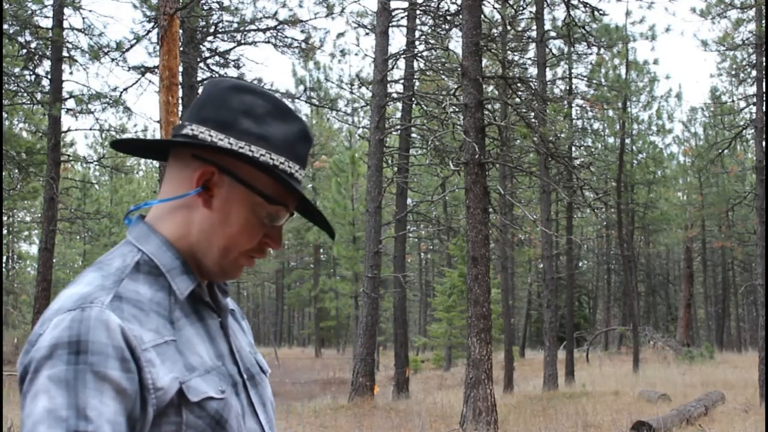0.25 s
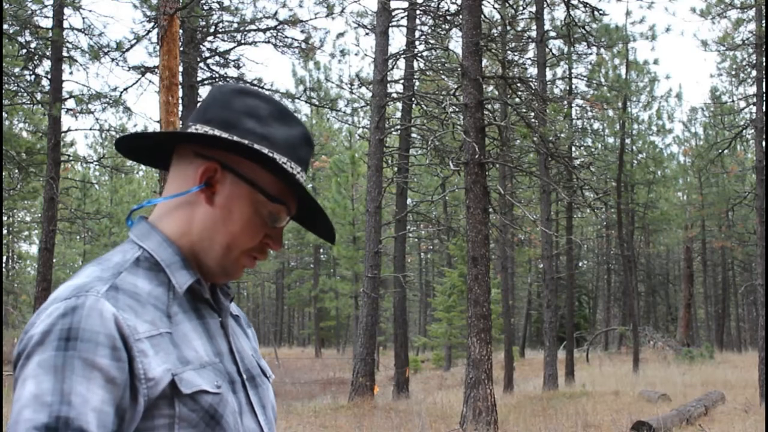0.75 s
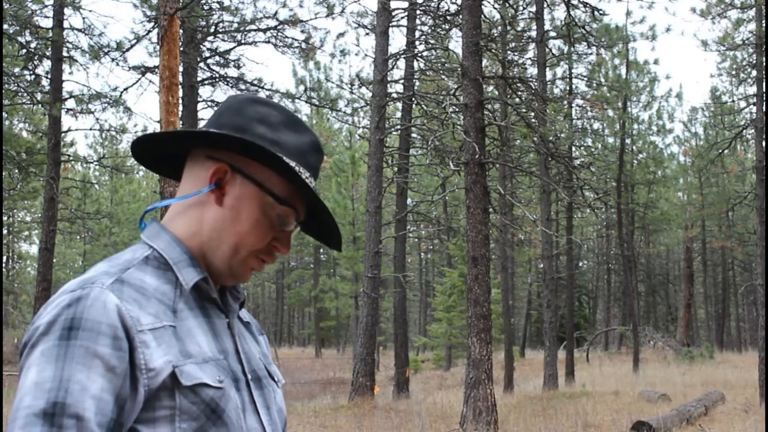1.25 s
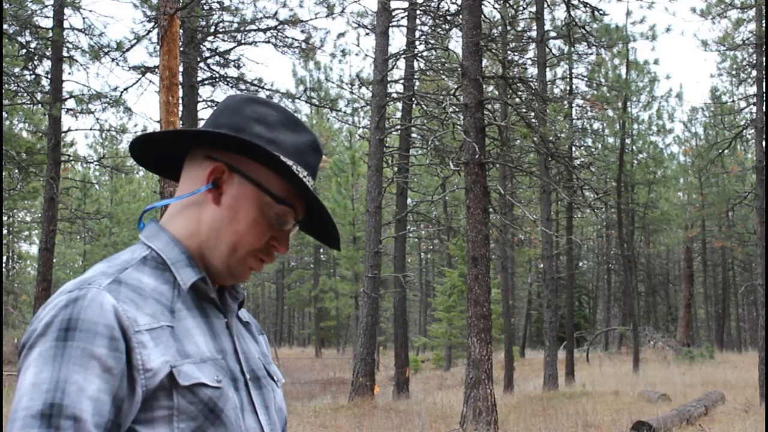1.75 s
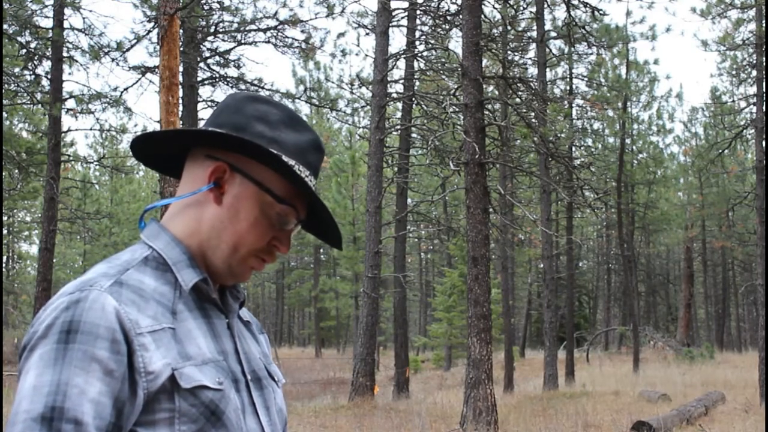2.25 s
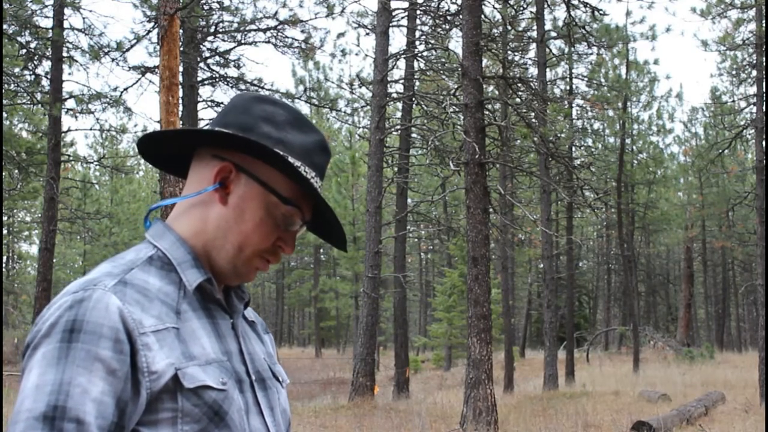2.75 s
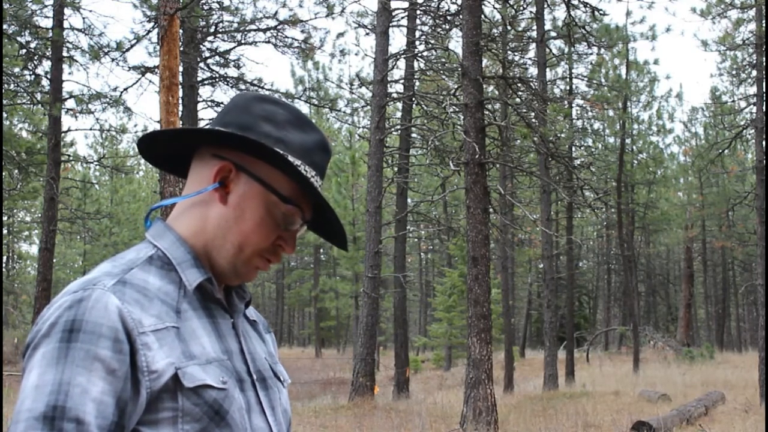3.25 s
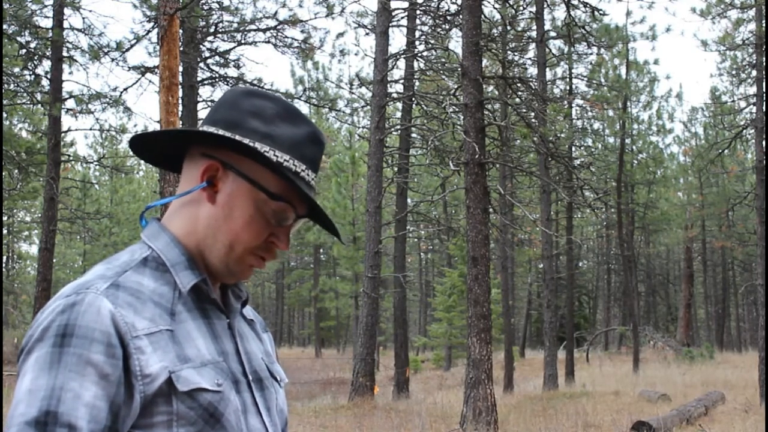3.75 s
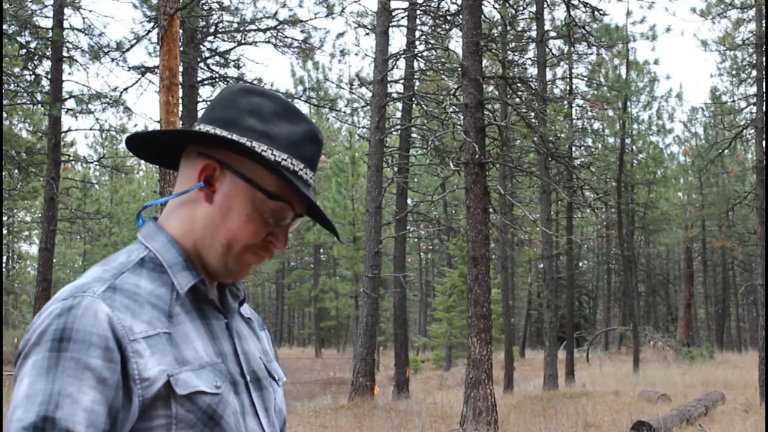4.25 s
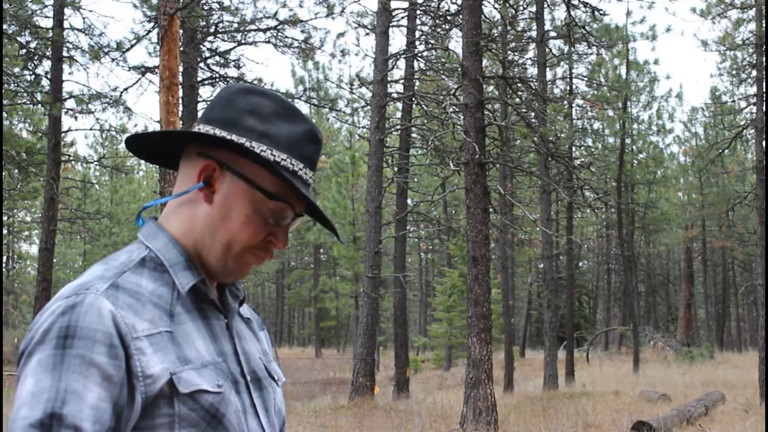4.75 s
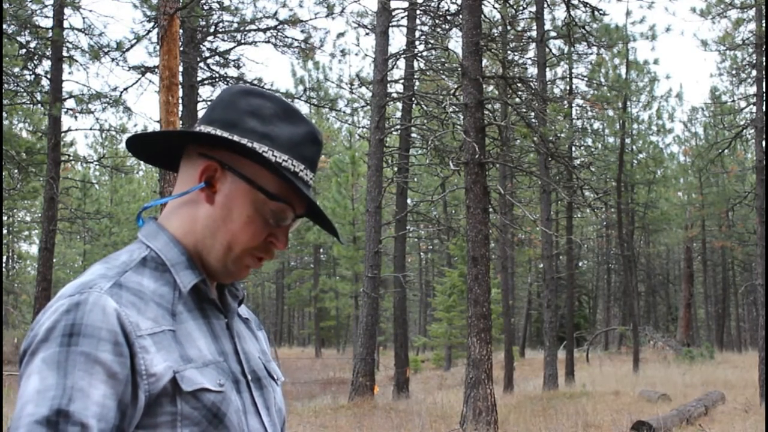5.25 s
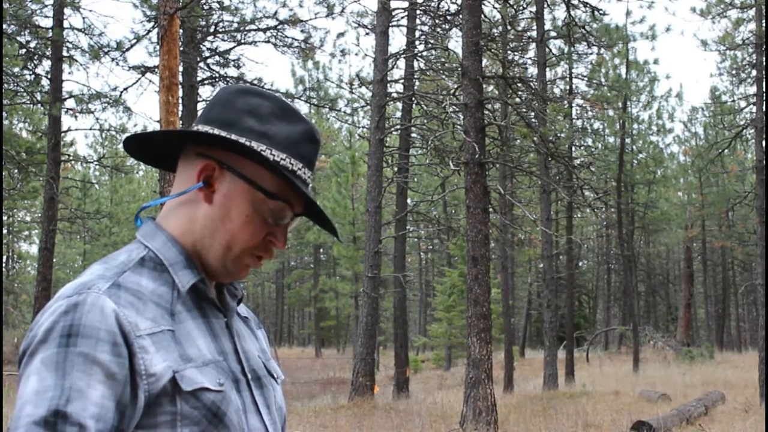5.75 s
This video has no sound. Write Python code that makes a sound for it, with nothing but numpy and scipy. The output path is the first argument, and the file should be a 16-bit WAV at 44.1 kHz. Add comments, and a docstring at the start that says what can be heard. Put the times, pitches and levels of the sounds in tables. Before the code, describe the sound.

A revolver is handled very near the microphone in open woodland: one snap, two separate series of loud ratcheting clicks with brief metallic ring, a quiet gap with faint skin-on-metal rubs, then a dry hammer drop, light touches and a softer final click. A low throbbing idle and airy rumble lie behind, dipping under the clicks and rising in the gaps. Nearly mono, with little echo.

```python
"""A sharp steel click opens the scene: a revolver is handled close to the microphone in a pine forest.
Its hammer is twice drawn through its notches, then dropped; random impact forces excite damped steel resonances.
Decaying sines leave a faint ring, and random slips make the rub of skin on steel.
Far off, engines idle and drone as sums of harmonics, under forest air and rumble made of filtered noise.
Loud clicks overload the recorder and duck its gain, so the background drops away and swells back."""
import sys
import numpy as np
from scipy import signal
from scipy.fft import rfft, irfft, next_fast_len
from scipy.io import wavfile
from scipy.ndimage import map_coordinates

SR = 44100
rng = np.random.default_rng(int(sys.argv[2]) if len(sys.argv) > 2 else 0)


def to_wav(s):
    """Save 16-bit WAV."""
    ch = np.atleast_2d(s).T  # columns
    pcm = np.round(np.clip(ch, -1, 1) * 32767)  # PCM
    wavfile.write(sys.argv[1], SR, pcm.astype(np.int16))


N = 264159
TIME = np.arange(N) / SR
HIT_TIME = TIME[:SR // 10]

# Hammer and lock clicks, levels before gain control:
# start_s, level_db, tilt_db_per_octave, tail_db, ring_db, movement (name)
LOCK_CLICKS = [ (0.0754, 7.5, 1.5, -15.5, -48, "drop"), (0.4081, 8.5, 4.5, -45, -24, "first draw"),
               (0.4863, 16, 5.5, -15.5, -23.5, "first draw"), (0.5976, 16.5, 5.5, -52, -28, "first draw"),
               (0.7614, 13, 4, -22, -34.5, "first draw"), (2.1604, 4.5, -2.5, -31, -30.5, "second draw"),
               (2.4090, 10, -1, -49, -31, "second draw"), (2.4960, 12, -1, -40.5, -41, "second draw"),
               (2.6705, 13.5, -0.5, -36, -33.5, "second draw"),
               (2.9442, 13.5, -0.5, -51, -28.5, "second draw"), (4.5379, -4.5, -1, -13.5, -58, "drop"),
               (4.5457, -4, -3.5, -27.5, -59.5, "drop"), (4.5497, 13.5, -2, -11.5, -37.5, "drop"),
               (5.7285, 2, -1, -21.5, -62, "drop")]
# Colour shared by the clicks of a movement, keyed by its name:
# chatter_length_ms, knock_offset_db, ping_offset_db, cylinder_ring_offset_db, frame_ring_offset_db
MOVEMENT_COLOURS = { "first draw": (5.5, 0.5, -8, 2.5, -16.5), "second draw": (6.5, 0.5, 9.5, -19.5, 5.5),
                    "drop": (2.5, 0.5, -3.5, -6.5, 0.5)}
# Lasting modes of the cylinder: pitch_hz, level_db (relative), t60_s
CYLINDER_MODES = [(4608, -11, .2), (4955, -9, .25), (5303, -15, .3), (5819, -4, .35), (6002, 0, .33),
                  (6146, -5, .25), (6245, -7, .15)]
# Lasting modes of the frame: pitch_hz, level_db (relative), t60_s
FRAME_MODES = [(2692, -10, .25), (3795, -5, .13), (4490, -10, .18), (4748, -4, .33), (4965, -9, .2),
               (5825, -11, .3), (6005, -8, .2), (6200, -3, .16), (9819, -11, .1)]


def revolver():
    """Impact and free vibration: each lock click leaves cylinder and frame ringing."""
    out = np.zeros(N)
    for start_s, level_db, tilt_db, tail_db, ring_db, movement in LOCK_CLICKS:
        length_ms, knock_db, ping_db, cylinder_db, frame_db = MOVEMENT_COLOURS[movement]
        impact = click(length_ms, tilt_db, KNOCK_MODE[0], knock_db, ping_db, tail_db)
        cylinder = from_db(ring_db + cylinder_db) * ring(CYLINDER_MODES)
        frame = from_db(ring_db + frame_db) * ring(FRAME_MODES)
        add(out, start_s, from_db(level_db) * impact)
        add(out, start_s, cylinder + frame)
    return out


def ring(modes):
    """Modal decay: a sum of exponentially dying sines, a little different at every blow."""
    t = TIME[:SR // 2]
    out = np.zeros(len(t))
    for pitch_hz, level_db, t60_s in modes:
        envelope = from_db(level_db + rng.normal(0, 0.59) - 60 * t / t60_s)
        out += envelope * np.sin(2 * np.pi * (pitch_hz * t + rng.random()))
    return out


# Main knock resonance of the gripped gun, a single row: pitch_hz, width_hz, level_db (relative)
KNOCK_MODE = (2680, 230, -6.5)
# High, quickly damped pings: pitch_hz, width_hz, level_db (relative)
PING_MODES = [(9870, 840, 1), (12730, 1300, -5)]
# Other quickly damped resonances of the gripped gun: pitch_hz, width_hz, level_db (relative)
BODY_MODES = [(589.4, 2600, -15), (1800, 300, -19.5), (3036, 660, -15.5), (3990, 800, -7),
              (5830, 940, -6.5), (6510, 350, -12), (7740, 1900, -6), (9120, 700, -7), (10370, 670, -15.5),
              (13500, 2300, -17)]


def click(length_ms, tilt_db, knock_hz, knock_db, ping_db, tail_db):
    """Forced resonance: chatter drives damped modes; where the blow lands sets its tilt, knock and ping."""
    knock = (knock_hz, KNOCK_MODE[1], KNOCK_MODE[2] + knock_db)
    pings = [(hz, width, db + ping_db) for hz, width, db in PING_MODES]
    sound = 0
    for hz, width, db in BODY_MODES + pings + [knock]:
        # each mode gets its own random chatter
        vibration = unit_hit(resonate(chatter(length_ms, tail_db), hz, width))
        sound = sound + from_db(db + tilt_octaves(tilt_db, hz)) * vibration
    # a small body radiates the bass weakly; the contact itself limits the treble
    radiation_hz, contact_hz = 260, 12900
    band = signal.butter(3, [radiation_hz, contact_hz], "band", fs=SR, output="sos")
    return unit_hit(signal.sosfilt(band, sound))


def chatter(length_ms, tail_db, second_db=-8.5, third_db=-11.5, decay_share=0.33):
    """Repeated impact: steel lands and rebounds twice, three dying bursts; a faint decaying hiss trails some
    clicks."""
    tail_t60_s = 0.076
    t = HIT_TIME * 1000 / length_ms  # in chatter lengths
    force = from_db(tail_db - 60 * HIT_TIME / tail_t60_s)
    for at, db in ((0, 0), (.36, second_db), (.72, third_db)):
        decay = np.exp(-(np.abs(t - at) / decay_share) ** np.sqrt(2))
        force = force + (t >= at) * from_db(db) * decay
    return force * rng.choice([-1, 1], len(t))


# Skin sliding on steel, levels before gain control:
# start_s, length_s, level_db, favoured_pitch_hz, favoured_level_db (relative to the common grain)
RUB_STROKES = [(3.47, 0.165, -34, 2590, 6), (3.588, 0.084, -38.5, 9500, -11), (4.137, 0.14, -44, 6540, -8),
               (4.589, 0.22, -37, 6670, -23.5), (4.789, 0.17, -39.5, 5170, -6),
               (5.069, 0.029, -36, 3680, 6), (5.336, 0.17, -44, 3400, 7)]


def fingers(slips_per_s=2600, tilt_db=-4.5, width_hz=260):
    """Stick-slip friction: tiny slips tick the gun's resonances; each stroke favours the part it rubs."""
    slips = (rng.random(N) < slips_per_s / SR) * rng.standard_normal(N)
    grain = np.zeros(N)
    for hz, width, db in BODY_MODES:
        grain += from_db(db + tilt_octaves(tilt_db, hz)) * rms_one(resonate(slips, hz, width))
    grain = rms_one(grain)
    out = np.zeros(N)
    for start_s, length_s, level_db, favoured_hz, favoured_db in RUB_STROKES:
        span = slice(int(start_s * SR), int((start_s + length_s) * SR))
        favoured = rms_one(resonate(slips[span], favoured_hz, width_hz))
        stroke = rms_one(grain[span] + from_db(favoured_db) * favoured)
        add(out, start_s, from_db(level_db) * stroke * signal.windows.tukey(len(stroke), .7))
    return out


# Light touches of fingers and loose parts, levels before gain control:
# start_s, level_db, chatter_length_ms, tilt_db_per_octave, knock_offset_db
LIGHT_TOUCHES = [ (0.033, -25.5, 10, -9, 12), (0.455, -18, 6.7, -11, 17), (0.719, -21, 6.8, -10, -2),
                 (1.305, -35, 12, -1, 0), (2.3464, -18, 3.4, -2.5, 2.5), (3.4905, -10.5, 3.6, 4, 26),
                 (4.712, -25.5, 1.4, 6, 7), (5.014, -21.5, 1, -2.5, -13), (5.189, -14, 6.8, 4.5, 8.5),
                 (5.1989, -13.5, 3.4, 7, 12), (5.352, -25.5, 5, -3.5, 3), (5.398, -32.5, 4.2, -12, 17)]


def handling():
    """Weak impact: light touches, and faint ticks scattered by chance through each slide of the fingers."""
    touch_knock_hz, tick_knock_hz = 2504, 3250
    ticks_per_s, tick_over_rub_db, tick_spread_db = 12, 3, 2.5
    out = np.zeros(N)
    for start_s, level_db, length_ms, tilt_db, knock_db in LIGHT_TOUCHES:
        touch = click(length_ms, tilt_db, touch_knock_hz, knock_db, ping_db=-6.5, tail_db=-25.0)
        add(out, start_s, from_db(level_db) * touch)
    for start_s, length_s, rub_db, *_ in RUB_STROKES:
        for at in rng.uniform(start_s, start_s + length_s, round(ticks_per_s * length_s)):
            tick = click(length_ms=2.5, tilt_db=-2.5, knock_hz=tick_knock_hz,
                         knock_db=4.5, ping_db=-5.0, tail_db=-30.5)
            add(out, at, from_db(rub_db + rng.normal(tick_over_rub_db, tick_spread_db)) * tick)
    return out


# Idling engine, speeding up a little and sagging again: time_s, four_firing_cycle_rate_hz
IDLE_RATE = [(0, 10.64), (0.3, 11.58), (1.2, 11.63), (2.2, 11.87), (2.9, 12.31), (4.2, 12.17), (5.1, 11.83),
             (5.99, 10.75)]
# Uneven cylinders fill in quarter orders: multiple_of_four_firing_cycle, level_db (mean, before gain control)
IDLE_HARMONICS = [(2, -42), (4, -32.5), (5, -35.5), (6, -35.5), (7, -45), (8, -32), (9, -52.5), (10, -46.5),
                  (11, -45), (12, -51)]
# Drone of the far engine: multiple_of_fundamental, level_db (mean at its crest, before gain control)
DRONE_HARMONICS = [(4, -42), (5, -42.5), (6, -49.5)]
# Spectrum of the forest air: pitch_hz, level_db_per_hz (relative)
AIR_SPECTRUM = [(30, -35), (150, -6), (280, -6), (570, -4), (750, -5), (980, -3), (1300, -13),
                (1900, -15.5), (2700, -20), (3600, -27.5), (5000, -30), (9400, -36), (12500, -42.5),
                (15500, -46.5)]
# Spectrum of the low rumble: pitch_hz, level_db_per_hz (relative)
RUMBLE_SPECTRUM = [(12, -11), (32, -7.5), (65, 16), (130, -2), (175, -14)]


def background():
    """Superposition of tones and noise: a throbbing idle, a higher drone, low rumble and forest air."""
    cycle_hz = np.interp(TIME, *np.transpose(IDLE_RATE))
    idle = engine(cycle_hz, IDLE_HARMONICS, waver_db=1.5, aligned_s=.033)
    # the drone creeps upward, loudest as the breeze carries it over
    drone_start_hz, drone_rise_hz_per_s = 66.17, .2
    drone_crest_s, drone_fade_db_per_s = 4.3, 1.76
    breeze = from_db(-drone_fade_db_per_s * np.abs(TIME - drone_crest_s))
    drone_hz = drone_start_hz + drone_rise_hz_per_s * TIME
    drone = breeze * engine(drone_hz, DRONE_HARMONICS, waver_db=4.0)
    air_db = -33 + drift(22) / 2
    air = from_db(air_db) * coloured(AIR_SPECTRUM)
    rumble = from_db(-48.5) * coloured(RUMBLE_SPECTRUM)
    return idle + drone + air + rumble


def engine(cycle_hz, orders, waver_db, aligned_s=0):
    """Harmonic synthesis: orders roughly aligned at a trough, each wavering on its way through the trees."""
    turns = np.cumsum(cycle_hz) / SR
    angle = 2 * np.pi * (turns - np.interp(aligned_s, TIME, turns))
    out = np.zeros(N)
    for order, level_db in orders:
        gain = from_db(level_db + waver_db * drift(6))
        phase = rng.normal(np.pi, 0.91)  # pi is a trough
        out += gain * np.cos(round(order) * angle + phase)
    return np.sqrt(2) * out


def drift(rate):
    """Slow random modulation: smooth chance of spread 1 that turns about rate times a second."""
    knots = rng.standard_normal(256)
    return rms_one(map_coordinates(knots, [TIME * rate], order=2, mode="mirror"))


def coloured(spectrum):
    """Spectral shaping: white noise weighted in frequency, at unit rms."""
    hz, db = np.transpose(spectrum)
    size = next_fast_len(N)
    bins = np.maximum(np.fft.rfftfreq(size, 1 / SR), 1)
    gain = from_db(np.interp(np.log(bins), np.log(hz), db))
    white = rfft(rng.standard_normal(size))
    return rms_one(irfft(white * gain, size)[:N])


def resonate(x, hz, width):
    """Damped oscillator: a two-pole resonance whose bandwidth sets its decay."""
    r = np.exp(-np.pi * width / SR)
    poles = [1, -2 * r * np.cos(2 * np.pi * hz / SR), r * r]
    return signal.lfilter([1 - r, 0, r - 1], poles, x + 1e-18)


def tilt_octaves(tilt_db, hz):
    """Spectral tilt: gain in decibels, growing per octave away from the main knock."""
    return tilt_db * np.log2(hz / KNOCK_MODE[0])


def from_db(db):
    """Logarithmic level: decibels to amplitude gain."""
    return 10 ** (np.asarray(db) / 20)


def rms_one(x):
    """Mean power: scale to unit rms."""
    return x / np.sqrt(np.mean(x ** 2) + 1e-20)


def unit_hit(x):
    """Impulse energy: scale a hit to the energy of 5 ms at unit rms."""
    return x / np.sqrt(np.sum(x ** 2) / (.005 * SR) + 1e-20)


def add(track, start_s, sound):
    """Superposition: mix a sound into the track from its start time."""
    start = max(int(start_s * SR), 0)
    track[start:start + len(sound)] += sound[:N - start]


def scene():
    """Mid and side: a nearly mono stereo image, with a little treble and air spread to the sides."""
    centre = revolver() + fingers() + handling() + background()
    side_treble = from_db(-48) * np.diff(centre, prepend=0)  # the slope favours treble
    side_air = from_db(-82.5) * coloured(AIR_SPECTRUM) + from_db(-56.5) * coloured(RUMBLE_SPECTRUM)
    balance = from_db([[-.08], [0]])
    return centre * balance + (side_air + side_treble) * np.array([[-1], [1]])


def gain_control(x, threshold_db=-15.5, attack_s=0.013, release_db_per_s=34.5, start_db=11.0):
    """Dynamic compression: gain falls within milliseconds of a loud sound and creeps back steadily."""
    size = SR // 200  # 5 ms
    power = signal.lfilter(np.ones(size) / size, [1], x[0] ** 2)
    over_db = np.maximum(10 * np.log10(power + 1e-12) - threshold_db, 0)
    # hold the greatest reduction so far, less the steady release since
    release_db = release_db_per_s * TIME
    held_db = np.maximum.accumulate(np.maximum(over_db + release_db, start_db)) - release_db
    r = np.exp(-1 / (attack_s * SR))
    reduction_db = signal.lfilter([1 - r], [1, -r], held_db, zi=[r * start_db])[0]
    return x * from_db(-reduction_db)


def record(dry):
    """Limited dynamic range and bandwidth: gain control, converter hiss, hard overload and a treble cutoff."""
    # pitch_hz, level_db_per_hz (relative)
    hiss_spectrum = [(100, -5.5), (3000, -6), (10000, 3.0), (13000, -7), (16000, -15.5)]
    hiss = from_db(-73.0) * np.array([coloured(hiss_spectrum) for channel in dry])
    overloaded = np.clip(gain_control(dry) + hiss, -1, 1)
    cutoff_hz = 15900
    lowpass = signal.ellip(10, .1, 70, cutoff_hz, fs=SR, output="sos")
    return signal.sosfilt(lowpass, overloaded)


dry = scene()
out = record(dry)
to_wav(out)
```